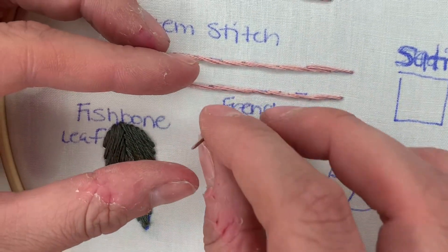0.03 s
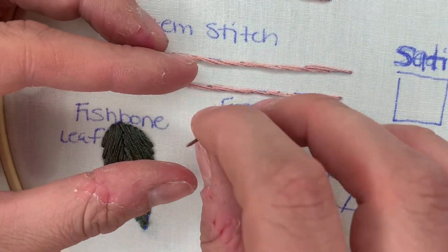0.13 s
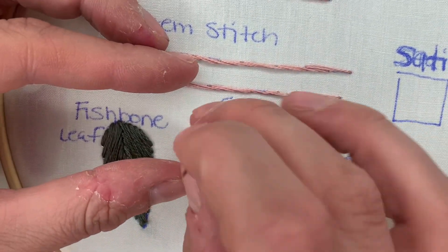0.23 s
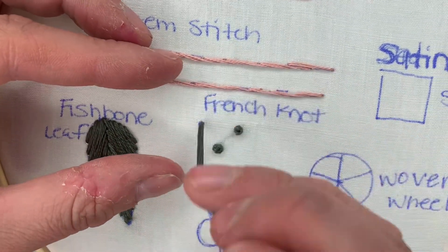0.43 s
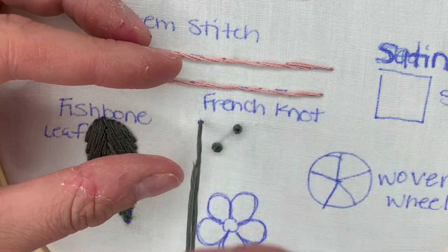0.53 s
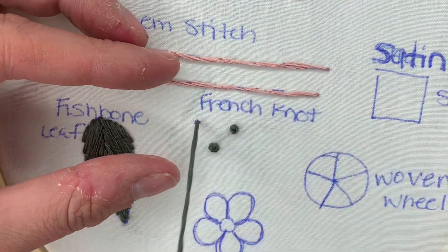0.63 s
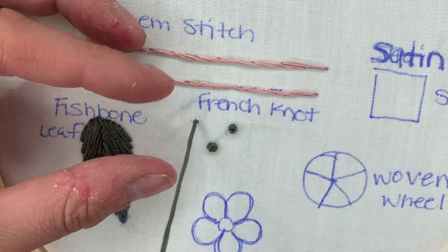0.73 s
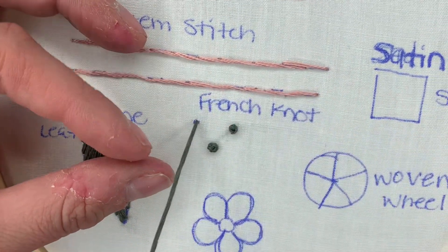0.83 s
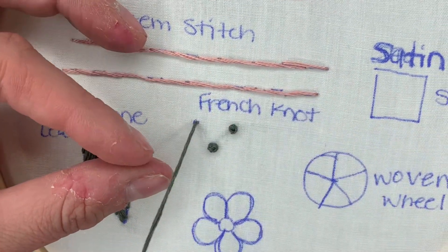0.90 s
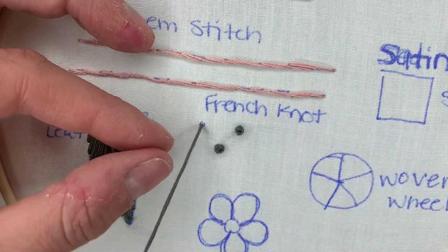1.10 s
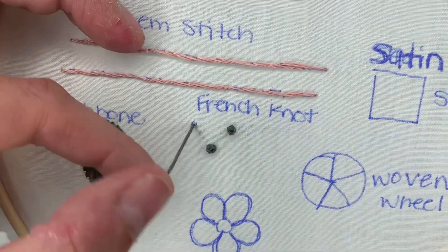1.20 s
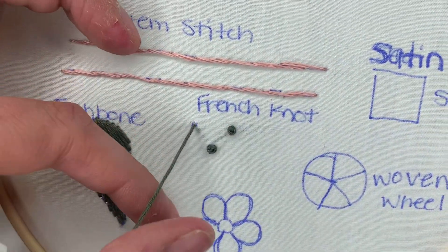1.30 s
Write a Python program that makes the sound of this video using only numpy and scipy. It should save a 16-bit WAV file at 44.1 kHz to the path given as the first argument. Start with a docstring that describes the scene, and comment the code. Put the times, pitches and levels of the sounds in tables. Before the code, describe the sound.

A needle punches through cloth stretched in a hoop with a dull thump and sharp pop, then thread rasps through in a short uneven drag and stops; faint rustles follow in a quiet room, close stereo microphone.

```python
"""First a quiet room is heard, then a needle pops through cloth stretched in a hoop, and thread is drawn after it.
The room is faint shaped hiss over a low rumble. Thread and fingers rub the weave in dense small slips
that ring the cloth like a drum, and the fibres hiss through the air. Each pop adds a short noisy snap
to damped tones of the cloth, treble first and bass last. A close two-port microphone picks it all up."""
import sys
import numpy as np
from scipy import signal
from scipy.fft import rfft, irfft, next_fast_len
from scipy.io import wavfile
from scipy.ndimage import map_coordinates

SR = 44100
rng = np.random.default_rng(int(sys.argv[2]) if len(sys.argv) > 2 else 0)


def file_out(sig):
    """Save sig as 16-bit WAV at sys.argv[1]."""
    # one column per channel
    cols = np.atleast_2d(sig).T
    # limit, then scale
    lim = np.clip(cols, -1, 1)
    pcm = np.round(lim * 32767).astype(np.int16)
    wavfile.write(sys.argv[1], SR, pcm)


def magnitude_from_level(level_db):
    """Linear magnitude for a level in decibels (20 dB per decade)."""
    exponent = np.asarray(level_db, float) / 20
    return 10 ** exponent


N = 59535  # length in samples, 1.35 s


def unit(x):
    """Scale to rms 1."""
    return x / np.sqrt(np.mean(x ** 2) + 1e-20)


def along(points, hz):
    """Read a curve of (frequency [Hz], value) points on a log frequency axis."""
    f, value = np.transpose(points)
    return np.interp(np.log(hz + 1), np.log(f + 1), value)


def wobble(rate):
    """A smooth random curve through normal random knots, rate knots a second."""
    knots = rng.standard_normal(int(N * rate / SR) + 4)
    return map_coordinates(knots, [np.arange(N) * rate / SR])


def filtered(x, response):
    """Shape the spectrum of x by a complex response of frequency."""
    m = next_fast_len(N + SR // 4)  # spare room for the ringing
    spectrum = rfft(x, m) * response(np.fft.rfftfreq(m, 1 / SR))
    return irfft(spectrum, m)[..., :N]


def resonant(peaks):
    """Response of damped resonances added with alternating sign; each rings only after it is struck."""
    def response(hz):
        total = 0
        for k, (center, width, db) in enumerate(peaks):
            damping = 1j * hz * width
            total = total + (-1) ** k * magnitude_from_level(db) * damping / (center * center - hz * hz + damping)
        return total
    return response


# How much louder the left port is than the right: (frequency [Hz], level difference [dB])
PORT_BALANCE = [(60, -8), (140, -3), (330, -3.5), (600, -6), (1200, -2.5), (1800, -3.5), (2400, -8),
                (3000, 0.5), (15000, -1.7)]
SPLIT_HZ, BODY_LAG_S = 1900, .00008  # below the split the left port lags a little
AIR_LEAD_S, AIR_TURN_RAD = .000232, 3.75  # above it the left port leads, turned back by a phase


def ports(x):
    """One source reaches the two ports with differences of level and timing that depend on frequency."""
    def pair(hz):
        air = 1 / (1 + (SPLIT_HZ / (hz + 1)) ** 8)  # near 1 above the split, near 0 below
        turn = 2 * np.pi * hz
        lead = air * (turn * AIR_LEAD_S - AIR_TURN_RAD) - (1 - air) * turn * BODY_LAG_S
        # each port takes half of the difference
        left = magnitude_from_level(along(PORT_BALANCE, hz) / 2) * np.exp(.5j * lead)
        return np.array([left, 1 / left])
    return filtered(x, pair)


# Color of the room hiss: (frequency [Hz], relative level [dB per Hz])
ROOM_HISS = [(30, -13.5), (200, 4.5), (500, 6), (1000, 2), (2000, -4), (6000, -6.5), (9000, -12),
             (12000, -6.5), (15500, -10.5), (16000, -51.5)]
# Color of the room rumble, alike at both ports: (frequency [Hz], relative level [dB per Hz])
RUMBLE = [(15, -39.5), (25, -11), (54, -4.5), (103, -15.5), (276, -21.5), (400, -35), (520, -73),
          (880, -120)]
HISS_DB, RUMBLE_DB = -81, -70.5  # rms levels; the rumble wavers around its own
NEAR_DB = -77  # hiss that comes the same way as the cloth, before its bass cut


def room():
    """Faint hiss, partly unrelated at the ports, over a shared wavering rumble."""
    hiss = unit(filtered(rng.standard_normal((3, N)), lambda hz: magnitude_from_level(along(ROOM_HISS, hz))))
    bass_cut = lambda hz: hz ** 2 / (hz ** 2 + SPLIT_HZ ** 2)
    near = ports(filtered(hiss[2], bass_cut))
    rumble = unit(filtered(rng.standard_normal(N), lambda hz: magnitude_from_level(along(RUMBLE, hz))))
    waver = magnitude_from_level(RUMBLE_DB + 0.5 * wobble(3.8))
    return magnitude_from_level(HISS_DB) * hiss[:2] + magnitude_from_level(NEAR_DB) * near + waver * rumble


SLIPS_PER_S = 4500  # average count
SLIP_EXTRA_DB = 1.1  # average of a random boost
FLUTTER_DB = 1.7  # size of the slow unevenness of the stroke


def slips():
    """Dense random stick-slip kicks of uneven size, in an unsteady stroke."""
    hit = rng.random(N) < SLIPS_PER_S / SR
    boost_db = SLIP_EXTRA_DB * rng.exponential(size=N)
    return hit * rng.standard_normal(N) * magnitude_from_level(boost_db + FLUTTER_DB * wobble(45))


# Strength of the rubbing by thread and fingers, before the ports:
# (time [s], level of the bass [dB], level of the middle [dB], level of the treble [dB])
RUBBING = [(0, -107, -100, -100), (0.044, -63, -109, -105.5), (0.087, -91, -89, -86),
           (0.113, -78, -73.5, -93), (0.134, -57.5, -63.5, -63.5), (0.181, -49, -61.5, -65),
           (0.2, -48, -47, -49), (0.211, -26.5, -49, -64.5), (0.221, -66, -62.5, -94),
           (.245, -53, -64.5, -86), (0.268, -54, -86, -89), (0.283, -82, -52, -65), (.3, -48.5, -36, -51),
           (0.324, -38, -32, -51), (0.348, -32, -40.5, -50), (0.392, -43.5, -49.5, -61),
           (0.427, -40.5, -51, -69), (.44, -46, -58.5, -92), (.455, -78, -54, -86),
           (0.461, -33, -41.5, -48), (0.479, -32.5, -52, -64.5), (0.528, -53.5, -53, -61.5),
           (0.588, -38, -49, -60), (0.649, -47.5, -54, -62.5), (.7, -42.5, -53, -62.5),
           (0.772, -44, -51, -61.5), (0.812, -47.5, -51.5, -66), (0.852, -45, -54, -65.5),
           (.875, -54.5, -58, -77.5), (.905, -63, -72.5, -78), (.97, -83, -90, -100),
           (1.079, -84.5, -84.5, -87), (1.119, -62, -64.5, -69), (1.15, -72, -72, -79.5),
           (1.199, -73.5, -65, -71.5), (1.225, -59, -68, -72), (1.245, -67, -60, -67.5),
           (1.27, -60, -70.5, -80), (1.288, -76, -87.5, -85), (1.35, -81, -76, -92)]
# Low resonances of the cloth drum under the drawn thread: (frequency [Hz], width [Hz], level [dB])
DRUM_PEAKS = [(97, 120, -10.5), (139, 51.5, 3), (200, 70, 0.5), (258.5, 33, -3)]
# Higher resonances of the weave under the drawn thread: (frequency [Hz], width [Hz], level [dB])
WEAVE_PEAKS = [(350, 19, -1), (450, 29, 5), (574, 30, -2.5), (695, 82, -3.5), (820, 93, -8),
               (1008, 84, -2.5), (1410, 50, -7.5), (1580, 110, -8), (1800, 110, -9.5), (2084, 140, -13.5),
               (2805, 160, -23), (3420, 300, -22)]
# Color of the hiss of the fibres: (frequency [Hz], relative level [dB per Hz])
FIBRE_HISS = [(1500, -30), (3000, -6), (4600, 1), (5400, -2), (5900, -10), (6900, -2), (7550, -13),
              (8500, -2), (9600, -6), (10600, -14), (12000, -11), (13400, -8), (15000, -8), (15700, -13),
              (16000, -50)]
UNLIKE_DB = -13.5  # the part of the rubbing that differs between ports, before its bass cut


def rubbing():
    """Slips ring the drum and the weave, and noise with some of the slips in it hisses in the fibres."""
    s, *columns = np.transpose(RUBBING)
    bass, middle, treble = [magnitude_from_level(np.interp(np.arange(N) / SR, s, c)) for c in columns]
    layers = []
    for _ in range(3):  # one shared by the ports, then one for each port alone
        kicks = slips()
        drum = unit(filtered(kicks, resonant(DRUM_PEAKS)))
        weave = unit(filtered(kicks, resonant(WEAVE_PEAKS)))
        rough_air = rng.standard_normal(N) + .3 * unit(kicks)
        fibres = unit(filtered(rough_air, lambda hz: magnitude_from_level(along(FIBRE_HISS, hz))))
        layers.append(bass * drum + middle * weave + treble * fibres)
    apart = filtered(np.array(layers[1:]), lambda hz: hz / (hz + 400))  # less bass
    return ports(layers[0]) + magnitude_from_level(UNLIKE_DB) * apart


# Pops of needle and thread through the weave: (time [s], strength [dB],
# cloth tension [pitch factor], contact softness: tones here are halved [Hz], snap level before low-pass [dB])
NEEDLE_POPS = [(0.2087, -18.5, 1.16, 450, -87), (0.2951, -1.5, .97, 6960, -18),
               (.4572, -23, 1.07, 1130, -42.5), (1.119, -61, 1.1, 918, -91),
               (1.236, -51.5, 1.71, 3470, -68.5)]
# Ringing modes of the stretched cloth at tension 1: (frequency [Hz], level [dB], time to fall 60 dB [s])
CLOTH_MODES = [(106.8, -6, 0.1), (143.5, 9.5, 0.045), (221, -8, 0.075), (300, -8, 0.06), (433, 1, 0.026),
               (602, -15, 0.005), (889, 0.5, 0.011), (1022.2, -4, 0.0087), (1512, 0, 0.0031),
               (1720, -5, 0.0091), (1915, -8.5, 0.0043), (2890, -12, 0.0036), (3760, -8, 0.0061),
               (5516, -7.5, 0.0053)]
ARRIVE_S, ARRIVE_SLOPE = .0037, .7  # travel time at 140 Hz and tension 1, and its fall with pitch
ATTACK_CYCLES = .42  # rise of a mode
SNAP_T60_S, SNAP_TOP_HZ = .008, 6500  # the thread snapping past the fibres


def pops():
    """Each pop rings the cloth modes, the low ones arriving late, after a short snap."""
    out = np.zeros(N + SR)
    t = np.arange(SR // 5) / SR
    low_pass = signal.butter(1, SNAP_TOP_HZ, fs=SR)
    snaps = signal.lfilter(*low_pass, rng.standard_normal((len(NEEDLE_POPS), len(t))))
    for (s, strength_db, tension, soft_hz, snap_db), noise in zip(NEEDLE_POPS, snaps):
        snap = magnitude_from_level(snap_db - 60 * t / SNAP_T60_S) * noise
        ring = np.zeros(len(t))
        for hz, level, t60 in CLOTH_MODES:
            arrival = ARRIVE_S * (140 / hz) ** ARRIVE_SLOPE / tension
            u = np.maximum(t - arrival, 0)  # time since this mode arrived
            f = hz * tension
            rise = (1 - np.exp(-u * f / ATTACK_CYCLES)) ** 2
            softening = 1 / (1 + (f / soft_hz) ** 3)  # a soft contact excites less treble
            ring -= magnitude_from_level(level - 60 * u / t60) * rise * np.sin(2 * np.pi * f * u) * softening
        out[round(s * SR):][:len(t)] += snap + magnitude_from_level(strength_db) * ring
    return ports(out[:N])


def scene():
    """All sources add up at the ports."""
    return room() + rubbing() + pops()


def top_cut(x):
    """Nothing passes above the cut-off."""
    return signal.sosfilt(signal.butter(12, 16640, fs=SR, output="sos"), x)


LOW_HZ, TOP_HZ = 55, 16300  # microphone band


def record(dry):
    """The microphone loses the deepest bass and the top."""
    def band(hz):
        bass_loss = 1 / np.sqrt(1 + (LOW_HZ / (hz + 1)) ** 6)
        return bass_loss / (1 + (hz / TOP_HZ) ** 80)
    mix = filtered(dry, band)
    return top_cut(mix)


dry = scene()
out = record(dry)
file_out(out)
```